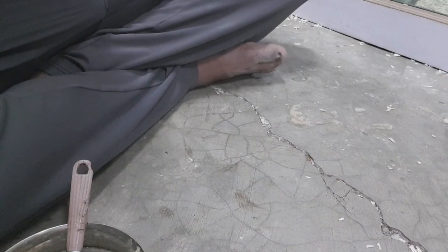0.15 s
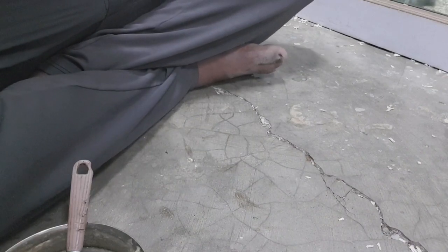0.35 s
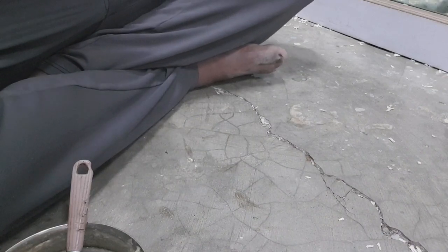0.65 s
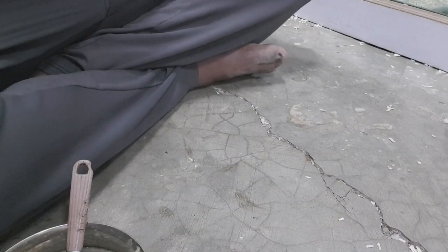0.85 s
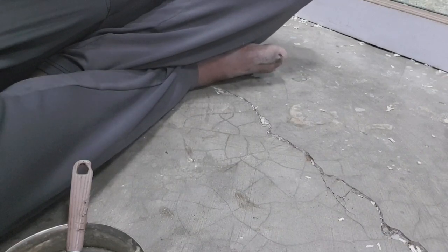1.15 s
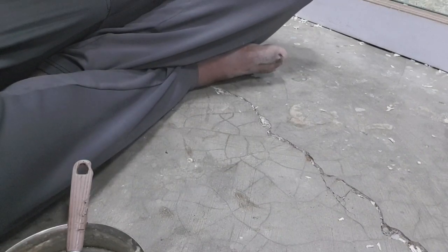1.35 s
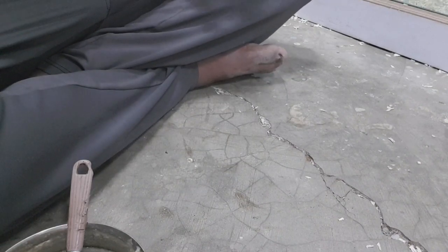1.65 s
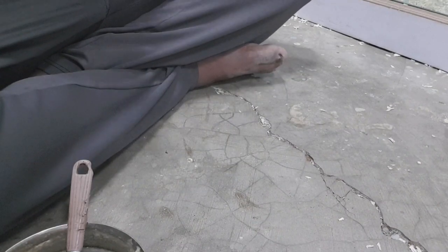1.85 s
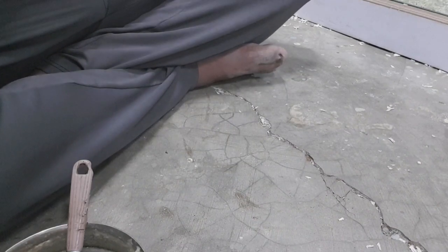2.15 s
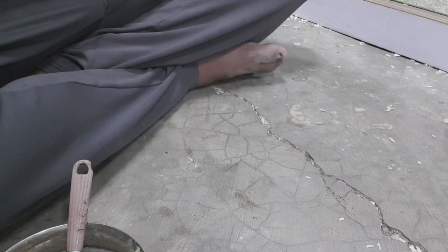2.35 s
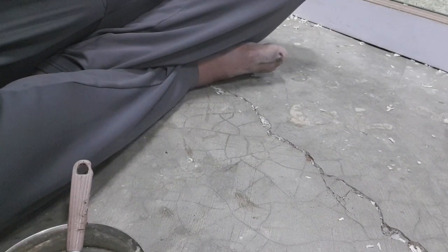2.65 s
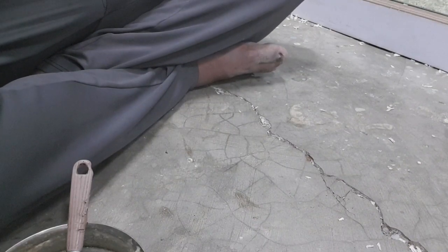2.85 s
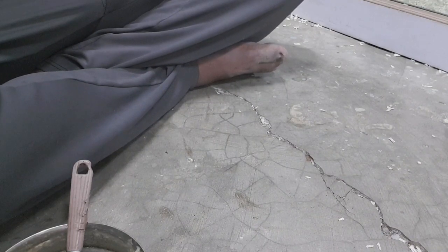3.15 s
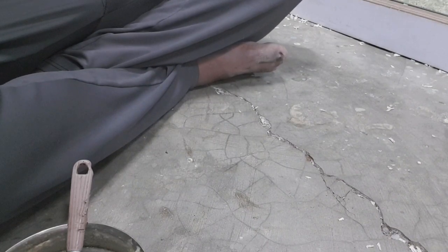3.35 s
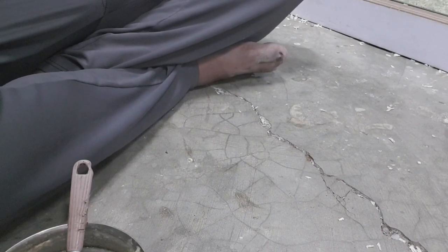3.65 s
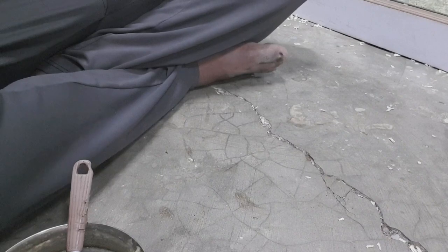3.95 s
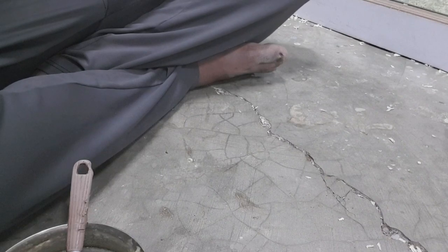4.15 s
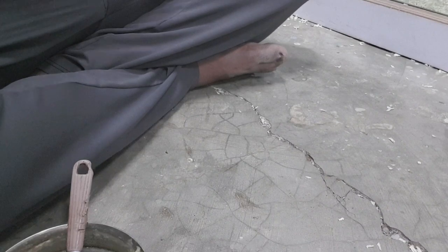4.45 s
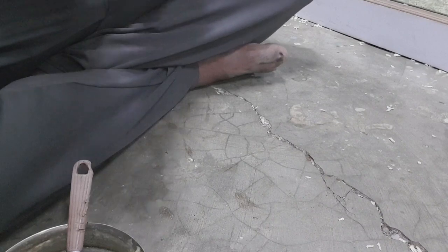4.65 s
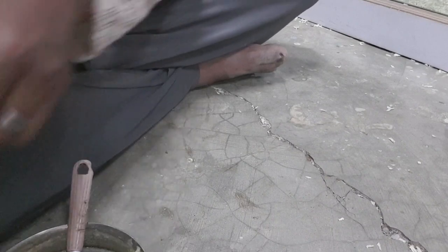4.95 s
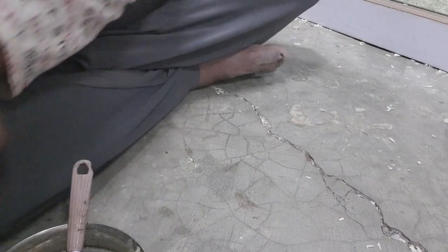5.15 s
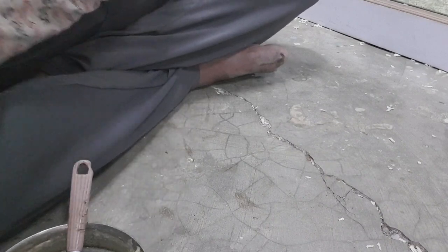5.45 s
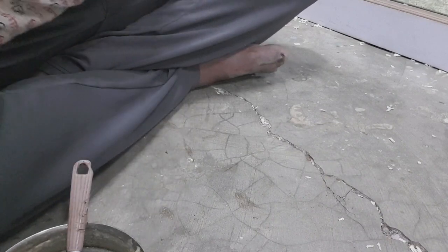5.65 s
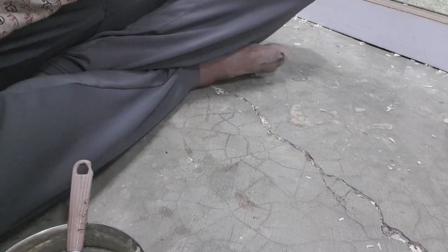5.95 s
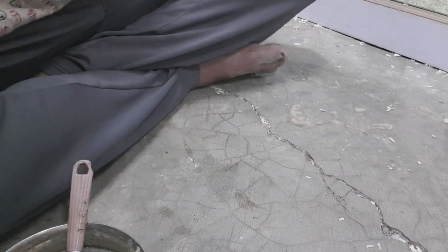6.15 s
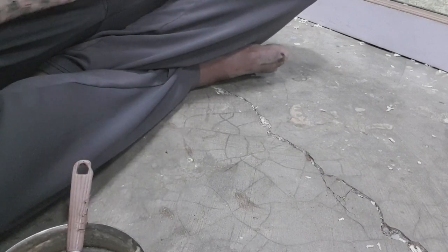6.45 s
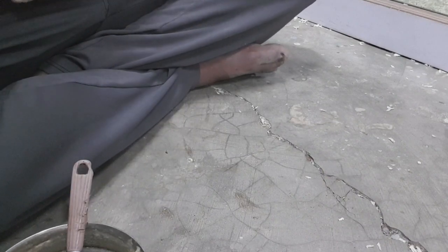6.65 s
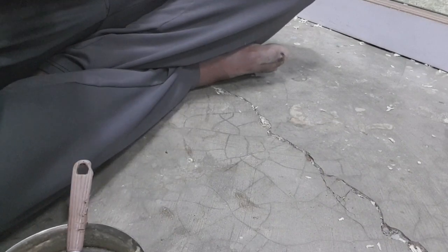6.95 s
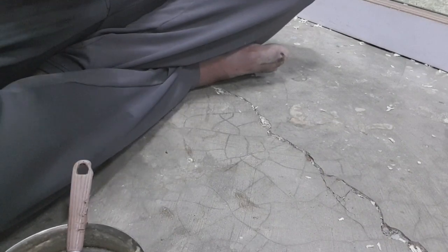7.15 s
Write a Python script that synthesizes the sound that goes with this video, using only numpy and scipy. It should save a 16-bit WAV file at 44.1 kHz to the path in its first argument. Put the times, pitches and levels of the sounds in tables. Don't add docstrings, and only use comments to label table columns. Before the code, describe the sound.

From the first instant two parrot chicks beg nearby, one deeper and one shriller, in quick raspy notes about a tenth of a second long, laced with bright squeals and ringing in a bare room. They stop around 0.7 s. From about 0.9 to 1.5 s a distant chick rasps and a small bird whistles thinly; light ticks follow. A second bout runs 1.8 to 2.4 s as a low motor drone fades up within the rumble, murmur and hiss. Far calls return near 2.6 s, with soft bumps, then three deep squawks at 3.1 to 3.4 s. Handling rumbles and bumps build to a hard close tap at 3.9 s; gliding whistles follow until 4.2 s. Squawks and squeals resume from 4.3 to 4.9 s and 5.1 to 5.8 s. Dry ticks scatter around 6.0 to 6.4 s, a last bout lasts 6.4 to 7 s, and two ticks close at 7.2 s.

```python
import sys
import numpy as np
from scipy import signal
from scipy.fft import rfft, irfft, next_fast_len
from scipy.io import wavfile
from scipy.ndimage import map_coordinates

SR = 44100
rng = np.random.default_rng(int(sys.argv[2]) if len(sys.argv) > 2 else 0)


def store_wav(level_fs):
    pcm = np.round(np.clip(np.atleast_2d(level_fs), -1, 1) * 32767)
    wavfile.write(sys.argv[1], SR, pcm.T.astype(np.int16))


def boost(x):
    u = np.asarray(x, float) / 20
    return 10 ** u


N = 321930

# start in seconds, length in seconds, pitch in Hz, level in dB, roughness 0-1.
DEEP_CHICK = [(0.124, 0.062, 1167, -24.5, 0.8), (0.248, 0.067, 1085, -26.5, 0.77),
              (0.34, 0.064, 1107, -38, 0.8), (0.421, 0.12, 1095, -28.5, 0.94),
              (1.763, 0.12, 1137, -27, 0.46), (1.868, 0.073, 1063, -21.5, 0.91),
              (1.99, 0.054, 1080, -22, 1.06), (2.095, 0.16, 1168, -30, 0.46),
              (2.24, 0.043, 1066, -22, 0.84), (3.122, 0.11, 1124, -25, 0.7),
              (3.263, 0.073, 1075, -21.5, 0.79), (3.371, .11, 1104, -26, 0.94),
              (4.302, 0.06, 1210, -27.5, 0.5), (4.423, 0.129, 1101, -24, 1), (4.548, 0.053, 1170, -30, 0.2),
              (4.637, 0.08, 1129, -27, 0.69), (5.301, 0.086, 1242, -29.5, 0.78),
              (5.41, 0.093, 1218, -27, 0.94), (5.539, 0.064, 1169, -24.5, 0.88),
              (5.671, 0.05, 1197, -26.5, 1), (5.714, 0.039, 1169, -21.5, 1.07),
              (6.379, 0.086, 1240, -25.5, 0.72), (6.501, 0.055, 1173, -23.5, 0.8),
              (6.628, 0.048, 1188, -23, 0.9), (6.759, 0.062, 1167, -25, 0.66)]
# start in seconds, length in seconds, pitch in Hz, level in dB,
# roughness 0-1.
SHRILL_CHICK = [(-.055, 0.093, 1604, -27.5, 0.86), (.322, 0.098, 1347, -28, 1.07),
                (0.51, 0.099, 1590, -28.5, 0.92), (0.619, 0.067, 1591, -26, 0.82),
                (1.763, 0.068, 1417, -25.5, 0.6), (2.089, 0.073, 1533, -27, 0.84),
                (2.331, 0.078, 1592, -29, 0.85), (4.309, 0.12, 1492, -34, 0.94),
                (4.752, 0.041, 1571, -31, 0.67), (4.876, 0.045, 1607, -30.5, 0.97),
                (5.115, 0.092, 1450, -36.5, 0.6), (5.193, 0.11, 1516, -34, 0.7),
                (5.306, 0.066, 1558, -38, 0.26), (6.921, 0.05, 1470, -35, 0.61)]
# start in seconds, length in seconds, pitch in Hz, level in dB.
FAR_CHICK = [(0.98, 0.063, 1197, -45), (1.117, 0.11, 1173, -45.5), (1.312, 0.053, 1144, -43.5),
             (1.467, 0.038, 1647, -47.5), (2.552, 0.089, 1602, -42), (2.708, 0.089, 1525, -42.5),
             (2.884, 0.098, 1586, -46.5), (3.613, 0.12, 1097, -50), (4.101, 0.12, 1277, -48),
             (3.746, 0.095, 1513, -55), (3.987, 0.093, 1560, -54)]
# frequency in Hz, level in dB per Hz.
THROAT = [(410, -66), (700, -6), (860, -9.5), (1110, -12), (1270, -19.5), (1910, -7), (2210, -9.5),
          (2640, -8.5), (3460, 0), (3990, -1.5), (4600, -1.5), (5800, 0), (8880, -8.5), (11600, -20),
          (15300, -37)]
# time in seconds, brightness in dB per octave,
# low throat band in dB, upper throat band in dB.
FACING = [(0, -2.5, 0, -1), (.15, 1.5, 2, 4), (.65, 1.5, -3, 0), (1.8, 1.5, -1, 3), (2.1, 0, -2, 2),
          (2.25, 1.5, 0, 3.5), (2.4, -3.5, 2, 1), (3.15, 0.5, -2.5, 0), (3.3, 1.5, -5, 0.5),
          (3.4, -2, -2, 0), (4.35, -1, -0.5, -1), (4.9, -2.5, -4.5, 0), (5.15, -2, -1, -1),
          (5.5, -2.5, -0.5, -2), (5.7, -4, 2.5, 3), (6.4, -1, -2.5, 2.5), (6.65, -1.5, 0, 1),
          (6.9, 0, -4, -3)]
# start in seconds, length in seconds,
# pitch in Hz, beak tuning in Hz, level in dB.
SQUEALS = [(.245, 0.049, 1186, 4750, -32.5), (0.332, 0.049, 1141, 4590, -26),
           (1.782, 0.053, 1415, 7075, -33), (2.357, 0.054, 1500, 3250, -34.5),
           (2.388, 0.04, 1617, 4853, -33), (3.137, .054, 1156, 4625, -38), (4.327, 0.076, 1200, 5740, -28),
           (4.353, 0.038, 1350, 5460, -31), (4.518, 0.068, 1090, 4000, -30.5),
           (4.56, 0.047, 1100, 5000, -35), (4.639, 0.03, 1110, 4480, -25.5),
           (4.689, 0.076, 1141, 5765, -31.5), (5.21, 0.075, 1526, 5900, -33), (5.303, .11, 1250, 6260, -34),
           (5.556, 0.03, 1190, 5950, -39), (6.399, 0.091, 1243, 5430, -25), (6.779, 0.038, 1169, 5200, -20),
           (0.12, 0.066, 1175, 5000, -38), (1.788, 0.038, 1150, 4700, -25), (1.894, 0.033, 1175, 4700, -25),
           (6.516, 0.034, 1187, 4750, -31), (6.645, 0.047, 1187, 4750, -28), (5.665, 0.05, 1220, 3660, -35),
           (.655, 0.03, 1605, 6740, -25), (5.31, .075, 1250, 3750, -36.5), (5.315, .1, 1250, 8750, -40),
           (5.21, .085, 1526, 7630, -39.5), (5.21, 0.077, 1530, 4590, -39.5),
           (5.435, 0.06, 1225, 6120, -37), (5.435, 0.041, 1225, 3680, -37), (5.575, .05, 1170, 3510, -38),
           (5.35, 0.054, 1570, 7850, -35), (3.39, 0.05, 1300, 4680, -34), (3.39, .04, 1150, 5750, -37),
           (3.265, 0.033, 1145, 5720, -33), (3.3, .05, 1110, 4440, -33), (3.165, 0.033, 1150, 7600, -31),
           (4.33, 0.035, 1210, 3630, -36), (4.57, .06, 1185, 5920, -31), (2.25, .04, 1065, 8600, -31.5)]
# start in seconds, length in seconds, pitch in Hz, level in dB.
MEWS = [(0.039, 0.068, 1545, -49), (.27, .05, 2306, -42), (0.318, .045, 2224, -40),
        (.387, 0.14, 2176, -41.5), (0.507, .021, 1595, -45.5), (0.676, 0.027, 1590, -54),
        (.696, 0.08, 2150, -49), (3.305, .035, 2187, -40), (4.308, 0.048, 1215, -47),
        (4.471, 0.054, 2220, -33), (4.618, 0.032, 688, -44), (4.642, 0.062, 2235, -32.5),
        (4.677, 0.034, 1126, -47), (5.195, 0.04, 1530, -54), (5.199, 0.056, 3087, -42.5),
        (5.36, 0.043, 1536, -49), (5.34, .1, 2480, -46), (5.568, 0.036, 2346, -39), (.54, 0.083, 2194, -45),
        (5.69, 0.029, 1155, -43), (6.383, .078, 2504, -42.5), (6.781, 0.03, 1727, -42),
        (6.927, 0.036, 1505, -46.5), (1.901, 0.094, 1081, -49), (2.02, .07, 1350, -48),
        (2.021, 0.11, 1050, -49), (2.3, 0.056, 1650, -47), (3.44, .06, 958, -48), (3.47, 0.053, 2202, -44),
        (4.49, .05, 693, -48), (6.622, .065, 1059, -47), (6.77, 0.037, 1132, -46),
        (5.311, 0.086, 1240, -49), (.66, .1, 1600, -54)]
# start in seconds,
# length in seconds, start pitch in Hz, end pitch in Hz, level in dB.
HOARSE_WHISTLES = [(1.29, 0.06, 3400, 3080, -51), (2.73, 0.12, 3770, 3680, -43),
                   (2.76, 0.094, 3340, 3400, -46), (2.859, .09, 3650, 3470, -52),
                   (1.01, 0.094, 6150, 6200, -53), (1.15, 0.098, 6300, 6170, -52),
                   (1.328, .08, 6250, 6150, -50), (.88, .08, 3006, 2950, -51.5), (3.6, .2, 2750, 2650, -53),
                   (3.62, .17, 3500, 3450, -52), (3.063, 0.07, 3540, 3750, -49.5),
                   (3.864, 0.088, 3680, 3730, -47.5), (3.967, .08, 3760, 3450, -43)]
# start in seconds, length in seconds, start pitch in Hz,
# end pitch in Hz, level in dB.
PURE_WHISTLES = [
    (0.118, 0.06, 384, 366, -45),
    (1.17, 0.083, 3480, 3610, -49),
    (1.25, .05, 3620, 3380, -50),
    (3.87, 0.12, 3100, 3155, -47),
    (4.127, 0.09, 3880, 3850, -48),
    (4.161, 0.083, 2710, 2625, -42),
    (4.222, 0.08, 3096, 3170, -40),
    (6.472, 0.02, 450, 430, -36),
]
# start in seconds, peak in dB, centre frequency in Hz.
TICKS = [(1.486, -30, 1800), (1.4852, -31.5, 600), (1.532, -33.5, 710), (1.627, -34, 590),
         (3.362, -30, 10800), (3.65, -24, 12200), (3.955, -36, 12000), (6.049, -33, 8000),
         (6.0495, -38, 10500), (6.0493, -40, 13000), (6.0983, -40, 7200), (6.2857, -42, 9500),
         (6.0987, -34, 5400), (6.1313, -28.5, 6700), (6.2856, -37, 4670), (6.2858, -35, 6700),
         (6.3595, -30, 10500), (6.3635, -25, 10600), (6.6694, -18, 10600), (7.198, -24.5, 9800),
         (7.2178, -30, 10500)]
# start in seconds, peak in dB, centre frequency in Hz.
BUMPS = [(0.229, -28, 77), (0.819, -28, 215), (1.487, -29, 106), (1.534, -46, 60), (1.626, -44, 72.7),
         (2.178, -26, 81), (2.239, -23, 145), (2.682, -22.5, 63.4), (3.632, -21, 214), (3.656, -24, 88.5),
         (3.737, -27, 102), (3.801, -22, 181.3), (3.836, -27, 135), (3.914, -48, 106), (3.922, -16, 150),
         (3.948, -26, 80.7)]
# start in seconds, peak in dB.
TAP = [
    (3.922, -14),
    (3.94, -35),
]
# frequency in Hz, level in dB, 60 dB decay time in seconds.
TAP_MODES = [(2640, 3.5, 0.0042), (1800, -12.5, 0.014), (8000, 6, 0.0012)]
# start in seconds, length in seconds, level in
# dB, centre frequency in Hz.
SWISHES = [(2.659, 0.032, -44, 10100), (2.663, .03, -45.5, 296), (3.719, 0.21, -56, 10000),
           (3.931, .013, -46, 6500), (4.964, 0.066, -65, 11000), (6.192, 0.051, -65, 8000),
           (6.763, .03, -54, 12500), (7.099, .075, -62, 11000), (7.219, .012, -63, 10800),
           (6.347, 0.027, -61, 11500), (0.897, 0.1, -51.5, 6000)]
# frequency in Hz, 60 dB decay time in seconds.
ROOM_DECAY = [(500, 0.4), (3000, 0.67), (6000, 0.56), (12000, 0.55)]
# time in seconds, level in dB.
BUSTLE = [
    (0.0, -44.5),
    (0.39, -55.5),
    (1.54, -56.5),
    (2.15, -52),
    (2.88, -55),
    (3.36, -47.5),
    (4.19, -51),
    (4.41, -50),
    (7.3, -51),
]
# frequency in Hz, level in dB per Hz.
MURMUR = [(88, -65), (150, -15.5), (221, -4), (376, -3.5), (516, -4.5), (898, -8.5), (1110, -7.5),
          (2500, -20.5), (3250, -56), (5500, -120)]
# frequency in Hz, level in dB per Hz.
RUMBLE = [(12, -46), (20, -13), (32, -1), (70, 0), (97, -8), (124, 2), (200, -4.5), (260, -11), (440, -120)]
# frequency in Hz, level in dB per Hz.
HISS = [(880, -30), (1500, 1.5), (2320, -2), (2510, -2.5), (4080, -10), (9390, -9.5), (15300, -33)]
# frequency in Hz, level in dB, line width in Hz.
HUM = [(80.2, -57, 6.7), (123.9, -60, 4.1)]


def unit(x):
    return x / np.sqrt(np.mean(x ** 2) + 1e-20)


def along(points, hz):
    f, v = np.transpose(points)
    return np.interp(np.log(hz + 1), np.log(f + 1), v)


def filtered(x, response):
    m = next_fast_len(len(x) + 2048)
    return irfft(rfft(x, m) * response(np.fft.rfftfreq(m, 1 / SR)), m)[:len(x)]


def wobble(size, rate_hz):
    knots = rng.standard_normal(size // 8 + 4)
    return map_coordinates(knots, [np.arange(size) * rate_hz / SR], order=1)


def swell(t, length, rise, fall):
    attack = np.sin(np.pi / 2 * np.clip(t / rise, 0, 1)) ** 2
    return attack * boost(-60 * np.clip(t - length, 0, None) / fall)


def add(track, s, sound):
    start = round(s * SR)
    sound = sound[max(-start, 0):]
    track[max(start, 0):][:len(sound)] += sound[:len(track) - max(start, 0)]


def syrinx_voice(t, length, hz, rough):
    orders = np.arange(1, 14)[:, None]
    arch = -.02 * (2 * t / (length + 0.028) - 1) ** 2
    jitter = 0.00593 + np.maximum(arch, -.03) + 0.00611 * wobble(len(t), 25.3)
    steady = 2 * np.pi * np.cumsum(hz * (1 + jitter)) / SR
    scatter = .029 * rough * wobble(len(t), 891.0)
    phase = steady + 2 * np.pi * np.cumsum(hz * scatter) / SR
    flutter = np.array([wobble(len(t), 340) for _ in orders])
    overtones = (orders * hz < SR * .45) * boost(5 / orders ** 7.3 - 3.5 * (orders == 3))
    half_pitch = 0.48

    chance_db = 1.3 * rng.standard_normal(orders.shape)
    drift_db = 4.9 * np.array([wobble(len(t), 63.7) for _ in orders])
    clear = np.sqrt(1 - rough) * np.cos(orders * steady) * boost(chance_db + drift_db - 6 / orders ** 2)
    clear = clear * (1 + half_pitch * np.cos(steady / 2))
    raspy = 1.58 * np.sqrt(rough) * np.minimum(orders / 1.9, 1) * flutter * np.cos(orders * phase)
    raspy = raspy * (1 + half_pitch * np.cos(phase / 2))
    return unit(np.sum((clear + raspy) * overtones, axis=0)), phase


def gated_breath(phase):
    jet = rng.standard_normal(len(phase)) * (1.7 + np.cos(phase))
    breath = unit(filtered(jet, lambda f: f ** 2 / (f ** 2 + 1600 ** 2)))
    return breath * boost(1.8 * wobble(len(phase), 488.0))


def vocal_tract(source, s, bright_db):
    times, *columns = np.transpose(FACING)
    turn_db, low_db, upper_db = [np.interp(s, times, column) for column in columns]
    beak_db = 2.2 * rng.standard_normal(60)

    def colour(f):
        tilt_db = (bright_db + turn_db) * np.log2(np.clip(f, 1500, 11000) / 5500)
        low = low_db * np.exp(-((f - 3290) / 290) ** 2)
        upper = upper_db * np.exp(-((f - 4540) / 290) ** 2)
        gap_db = np.interp(f / 300, np.arange(len(beak_db)), beak_db)
        return boost(along(THROAT, f) + tilt_db + low + upper + gap_db)

    return filtered(source, colour)


def chicks():
    out, t = np.zeros(N), np.arange(SR // 5) / SR
    notes = [(*note, 0.46) for note in DEEP_CHICK]
    notes += [(*note, -0.03) for note in SHRILL_CHICK]
    notes += [(*note, 1, 0) for note in FAR_CHICK]
    lead = .003
    for s, length, hz, db, rough, bright_db in notes:
        rough = np.clip(rough, 0, 1)
        voice, phase = syrinx_voice(t, length, hz, rough)
        stumble = boost(1.35 * rough * wobble(len(t), 206.0))
        source = stumble * (voice + 1.7 * rough * gated_breath(phase))
        note = unit(vocal_tract(source, s, bright_db))
        push_db = 0.59 * (np.minimum(t / length, 1) - 1.5)
        envelope = swell(t, length + lead, rise=0.033, fall=0.17)
        add(out, s - lead, boost(db - 2.5 + push_db) * envelope * note)
    return out


def squeals():
    out, t = np.zeros(N), np.arange(SR // 4) / SR
    orders = np.arange(1, 10)[:, None]
    mews = [(s, length, hz, hz, db) for s, length, hz, db in MEWS]
    for s, length, hz, beak_hz, db in SQUEALS + mews:
        glide = hz * (1 - 0.13 * (np.minimum(t, length) - length / 2))
        hoarse = 0.0094 * wobble(len(t), 406) + 0.0091 * wobble(len(t), 43.5) + 22 / hz * wobble(len(t), 150)
        phase = 2 * np.pi * np.cumsum(glide * (1 + hoarse)) / SR
        skirt_db = -13.5 * np.abs(orders * hz - beak_hz) / 1000
        stack = np.sum(boost(skirt_db) * np.sin(orders * phase), axis=0)
        level = boost(db + 2 + 3.7 * wobble(len(t), 83.3))
        add(out, s, level * swell(t, length, rise=0.02, fall=0.094) * stack)
    return out


def far_bird():
    out, t = np.zeros(N), np.arange(SR // 4) / SR
    whistles = [(*w, 0.06) for w in HOARSE_WHISTLES] + [(*w, 0.027) for w in PURE_WHISTLES]
    for s, length, start_hz, end_hz, db, warble in whistles:
        glide = start_hz + (end_hz - start_hz) * np.clip(t / length, 0, 1)
        phase = 2 * np.pi * np.cumsum(glide * (1 + warble * wobble(len(t), 509.0))) / SR
        add(out, s, boost(db) * swell(t, length, rise=0.029, fall=0.03) * np.sin(phase))
    return out


def small_contacts():
    out, t = np.zeros(N), np.arange(SR // 2) / SR
    for s, db, hz in TICKS:
        cycles = np.clip(hz / 400, 3, 25)
        onset = 1 - np.exp(-(t / 0.00034) ** 2)
        add(out, s, boost(db + 5.0 - 60 * t * hz / cycles) * np.sin(2 * np.pi * hz * t) * onset)
    for s, db, hz in BUMPS:
        onset = 1 - np.exp(-t / 0.00019)
        add(out, s, boost(db - 2.5 - 60 * t * hz / 3) * np.sin(2 * np.pi * hz * t) * onset)
    for s, db in TAP:
        ring = sum(boost(level - 60 * t / t60) * np.sin(2 * np.pi * hz * t) for hz, level, t60 in TAP_MODES)
        add(out, s, -boost(db + 3) * ring * np.minimum(t / .0002, 1) ** 2)
    for s, length, db, hz in SWISHES:
        band = lambda f: np.exp(-((f - hz) / (600 + 0.24 * hz)) ** 2)
        rub = unit(filtered(rng.standard_normal(len(t)), band))
        level = boost(db + 3.2 * wobble(len(t), 82))
        add(out, s, level * swell(t, length, rise=length / 3, fall=0.051) * rub)
    return out


def room(x, count=4):
    hz, t, z = signal.stft(rng.standard_normal((count, SR)), SR, nperseg=256)
    decay = boost(-60 * t / along(ROOM_DECAY, hz)[:, None])
    tails = signal.istft(z * decay, SR, nperseg=256)[1]
    aims = np.array([wobble(N, 14) for _ in tails])
    aims = aims / np.linalg.norm(aims, axis=0)
    fed = np.pad(aims * x, ((0, 0), (200, 0)))
    echoes = signal.fftconvolve(fed, tails / np.linalg.norm(tails[0]), axes=1)
    return echoes.sum(axis=0)[:N]


def noise(response):
    return unit(filtered(rng.standard_normal(N), response))


def motor_line(hz, width):
    return noise(lambda f: 1 / (1 + ((f - hz) / width) ** 2))


def house():
    now = np.arange(N) / SR
    murmur_db = np.interp(now, *np.transpose(BUSTLE))
    handling_db = 9 * np.exp(-((now - 3.81) / 0.21) ** 2)
    rumble_db = -52.5 + 0.27 * (murmur_db - murmur_db.mean()) + handling_db
    rumble = boost(rumble_db + 1.2 * wobble(N, 8.7)) * noise(lambda f: boost(along(RUMBLE, f)))
    drone = boost(-8) * np.clip((now - 1.9) / 0.48, 0, 1) * motor_line(hz=509.7, width=11.0)
    voices = noise(lambda f: boost(along(MURMUR, f))) + drone
    murmur = boost(murmur_db + 1.13 * wobble(N, 13) + 1.5) * voices
    hiss = boost(-56.0) * noise(lambda f: boost(along(HISS, f)))
    hum = sum(boost(db) * motor_line(hz, width) for hz, db, width in HUM)
    return rumble + murmur + hiss + hum


def scene():
    rasp, clear, far, taps = chicks(), squeals(), far_bird(), small_contacts()
    direct = boost(0.5) * (rasp + clear) + boost(0.5) * far + taps
    echoes = room(boost(2) * rasp + boost(-8.5) * clear + far + boost(-11.5) * taps)
    return (direct + echoes + house())[None]


def roll_off(x):
    return signal.sosfilt(signal.butter(12, 15410, fs=SR, output="sos"), x)


def record(dry):
    mix = filtered(dry[0], lambda f: (f < 15350) * (f > 33))[None]
    return roll_off(mix)


dry = scene()
out = record(dry)
store_wav(out)
```